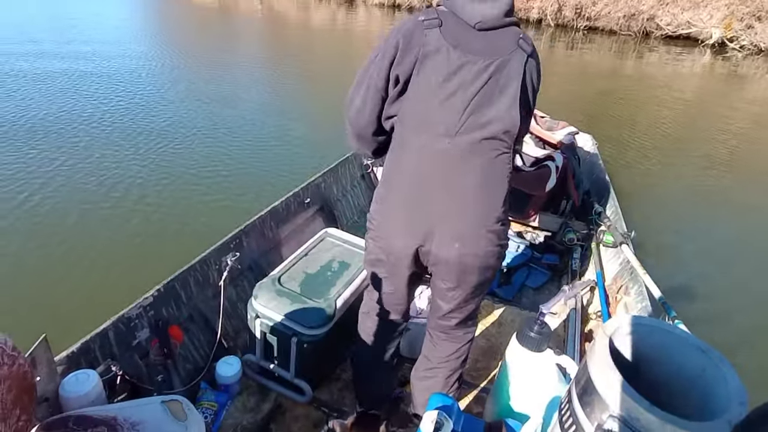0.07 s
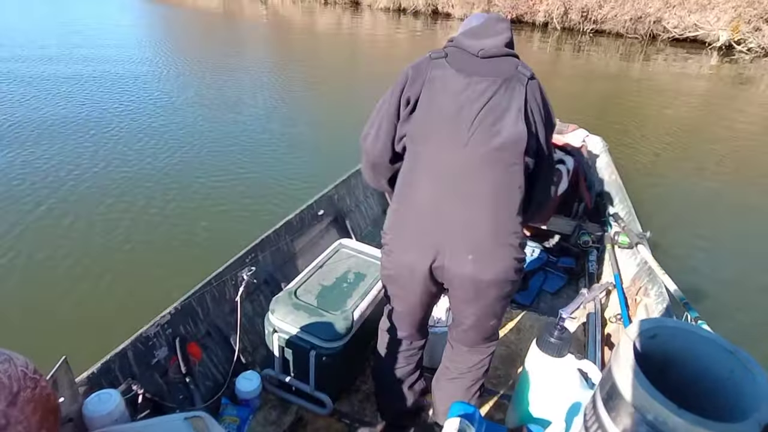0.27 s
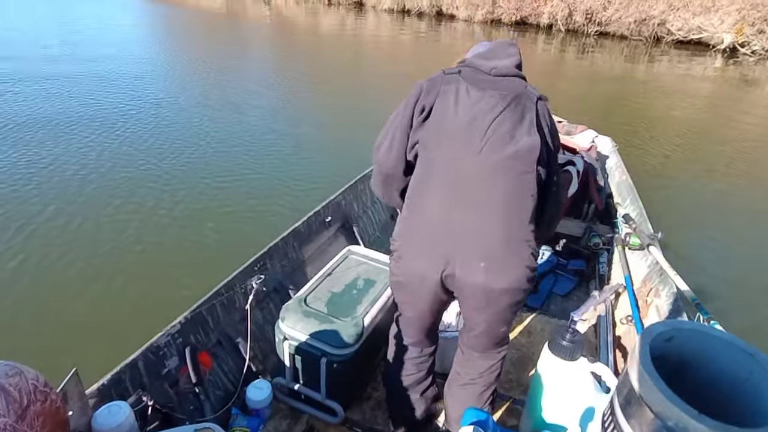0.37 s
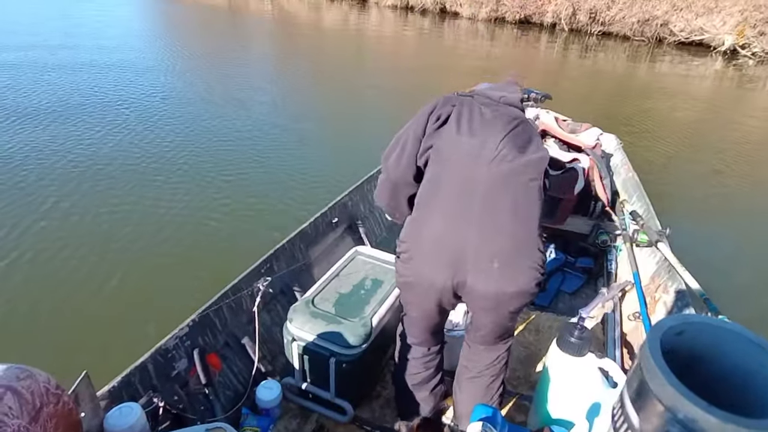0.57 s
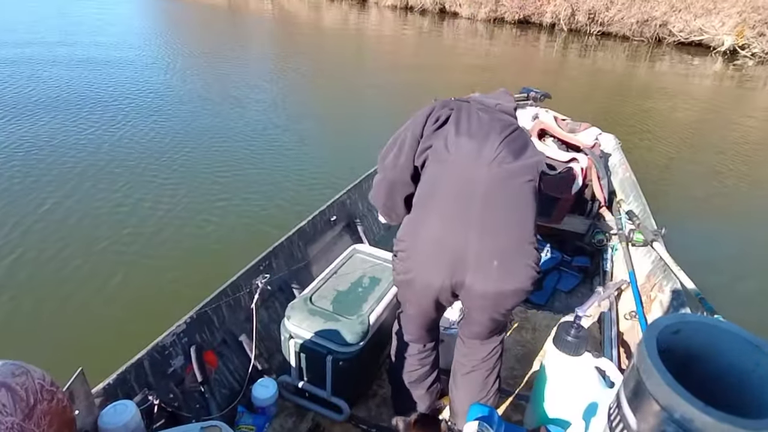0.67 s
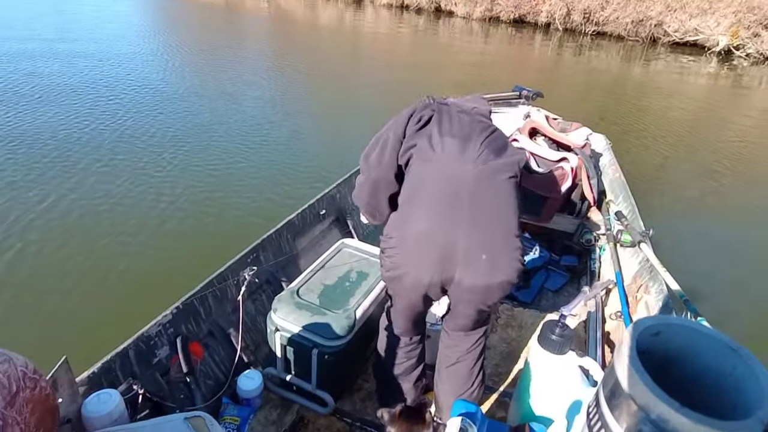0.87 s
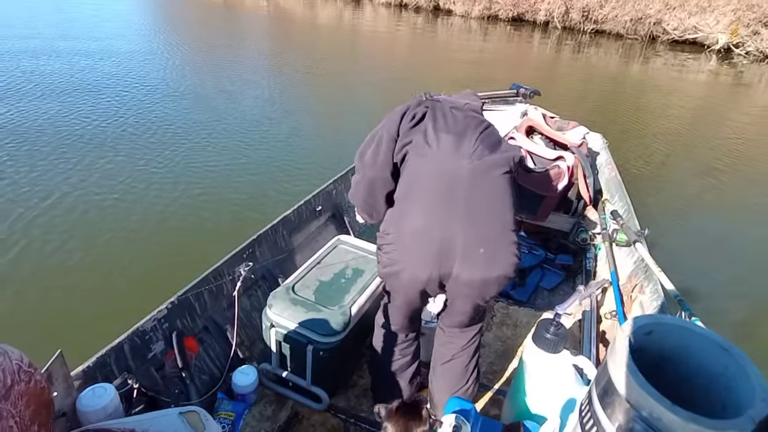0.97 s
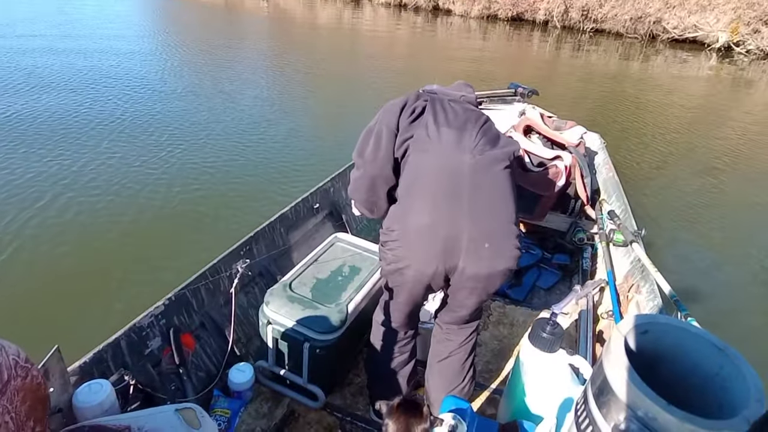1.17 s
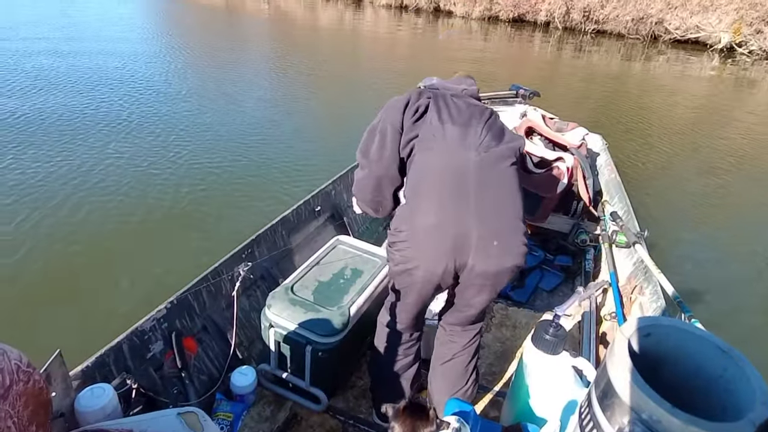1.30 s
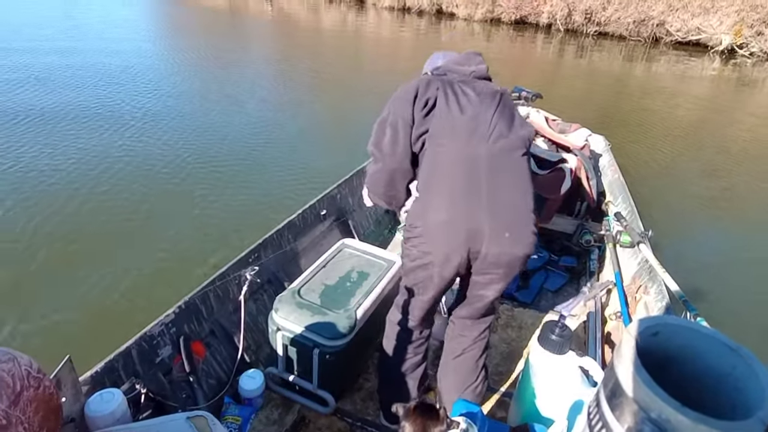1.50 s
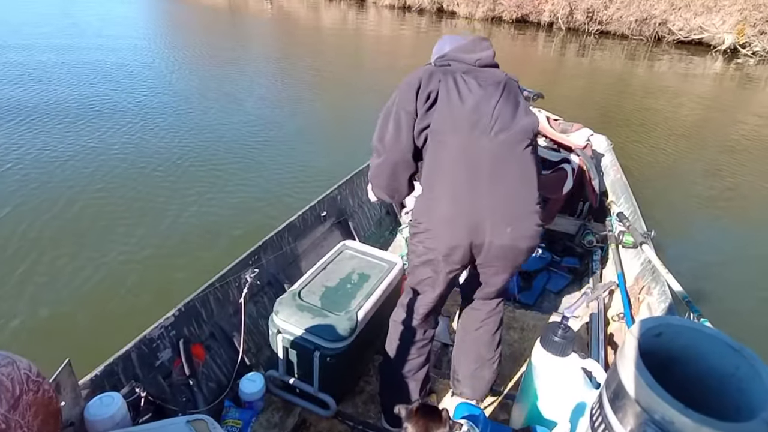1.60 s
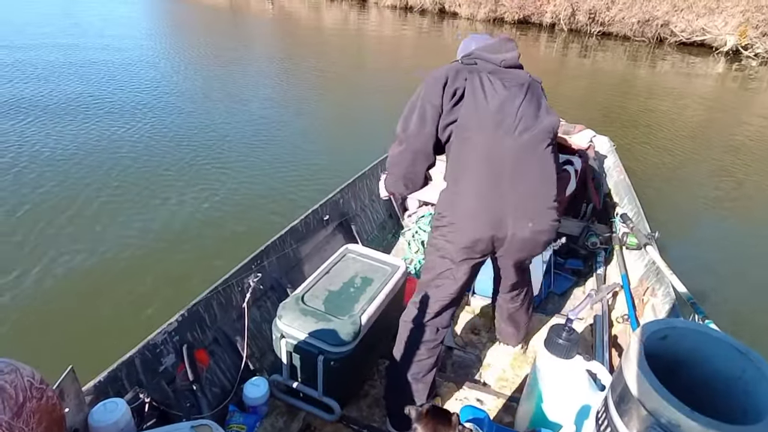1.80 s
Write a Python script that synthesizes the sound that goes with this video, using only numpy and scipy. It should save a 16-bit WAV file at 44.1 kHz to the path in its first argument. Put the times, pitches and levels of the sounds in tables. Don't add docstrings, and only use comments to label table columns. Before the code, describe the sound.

Knocks and thuds in a small metal boat, close and dry in stereo. A short gritty scuff comes at the start, then the loudest boot knock at 0.23 seconds booms the floor panel. Uneven low bumps, taps and rattles continue to about 1.15. A hollow box drags softly around 1.35, then scrapes and knocks near 1.7. Very faint air hiss and high insect ticking lie beneath.

```python
import sys
import numpy as np
from scipy import signal
from scipy.fft import rfft, irfft, next_fast_len
from scipy.io import wavfile
from scipy.ndimage import uniform_filter1d

SR = 44100
rng = np.random.default_rng(int(sys.argv[2]) if len(sys.argv) > 2 else 0)


def linear_from_db(decibels):
    return 10 ** (np.asarray(decibels, float) / 20)


def file_out(sig):
    cols = np.atleast_2d(sig).T
    lim = np.clip(cols, -1, 1)
    pcm = np.round(lim * 32767).astype(np.int16)
    wavfile.write(sys.argv[1], SR, pcm)


N = 81585
T = np.arange(N) / SR
BAND_EDGES_HZ = 30 * 2 ** np.arange(0, 9.3, 0.5)
LIKENESS = 0.14


def rms_one(x):
    return x / np.sqrt(np.mean(x ** 2) + 1e-20)


def at_hz(points, hz):
    p = np.array(points)
    return np.interp(np.log(hz + 1), np.log(p[:, 0] + 1), p[:, 1])


def high_pass(x, hz):
    return signal.sosfilt(signal.butter(4, hz, "high", fs=SR, output="sos"), x)


def ring(force, hz, t60_s):
    radius = linear_from_db(-60 / (t60_s * SR))
    w = 2 * np.pi * hz / SR
    return signal.lfilter([0, np.sin(w)], [1, -2 * radius * np.cos(w), radius ** 2], force + 1e-18)


def grains(rate_per_s):
    size = linear_from_db(3 * np.minimum(rng.exponential(1, N), 4))
    return size * rng.choice([-1, 1], N) * (rng.random(N) < rate_per_s / SR)


def bands(spectrum, likeness):
    edges = BAND_EDGES_HZ[BAND_EDGES_HZ > spectrum[0][0]]
    centre_hz = np.sqrt(edges[1:] * edges[:-1])
    level = linear_from_db(at_hz(spectrum, centre_hz))
    white = rng.standard_normal((2, 2, N))
    out = []
    for k, (low, high) in enumerate(zip(edges, edges[1:])):
        band = signal.butter(2, [low, high], "band", fs=SR, output="sos")
        mid, side = signal.sosfilt(band, white[k % 2])
        out.append(level[k] * (np.sqrt(1 + likeness) * mid + np.sqrt(1 - likeness) * side * [[1], [-1]]))
    return np.array(out) / np.sqrt(np.mean(np.sum(out, axis=0) ** 2)), np.log2(centre_hz / 4000)


# freq_hz, density_db_per_hz
AIR_COLOUR = [(18, -33), (30, -4.5), (145, 3), (311, -32), (760, -13), (1670, -20), (5900, -22),
              (16000, -41)]


def air():
    return linear_from_db(-80.5) * bands(AIR_COLOUR, likeness=0.17)[0].sum(axis=0)


def insect():
    tone_hz, pulses_per_s, first_s, pulse_s = 7990, 29.58, 0.009, 0.016
    phase = ((T - first_s) * pulses_per_s % 1) / pulses_per_s / pulse_s
    waver = rms_one(ring(rng.standard_normal(N), tone_hz, 0.028))
    tone = np.sin(2 * np.pi * tone_hz * T) + 0.5 * waver
    return linear_from_db(-86) * tone * np.sin(np.pi * np.minimum(phase, 1))


# start_s, length_s, hiss_db, tilt_db_per_octave, rib_rattle_db
SCUFFS = [(0.023, 0.036, -46.5, 1.2, -59), (0.567, 0.04, -95.5, -13, -64), (0.226, 0.074, -61, -4.5, -48),
          (0.313, 0.077, -84, -12, -58), (0.479, 0.074, -61, -3.5, -47), (0.642, 0.105, -72, -4.5, -60.5),
          (0.808, 0.048, -74, 0, -54), (0.842, 0.08, -69.5, -5.5, -51.5), (0.901, 0.14, -79.5, 0.5, -56),
          (1.047, 0.034, -54, 7, -58), (1.102, 0.1, -71.5, -5, -57.5), (1.313, 0.11, -63.5, -2, -62),
          (1.388, 0.11, -68.5, 5, -82.5), (1.594, 0.16, -69.5, 0.4, -78.5)]


def strokes():
    out = []
    for start_s, length_s, *_ in SCUFFS:
        age = (T - start_s) / length_s
        after_s = np.maximum(T - start_s - length_s, 0)
        rise = np.clip(age / 0.34, 0, 1) ** 2
        sag = linear_from_db(6 * (0.5 - np.clip(age, 0, 1)))
        release = linear_from_db(-60 * after_s / (0.045 + 0.35 * length_s))
        tail = linear_from_db(-16 - 60 * after_s / 0.25)
        out.append(rise * sag * (release + tail))
    return np.array(out)


# freq_hz, density_db_per_hz
SCUFF_COLOUR = [(530, -4), (900, 0.5), (1570, -4), (1990, -0.5), (2930, -10.5), (6480, -12.5),
                (14900, -35.5), (16000, -36)]


def scuffs():
    noise, octave = bands(SCUFF_COLOUR, LIKENESS)
    rows = np.array(SCUFFS)
    gain = linear_from_db(rows[:, 2] + rows[:, 3] * octave[:, None]) @ strokes()
    grit = rms_one(uniform_filter1d(rng.standard_normal(N), size=120))
    patch = rms_one(uniform_filter1d(rng.standard_normal(gain.shape), size=900, axis=1))
    gain = gain * linear_from_db(2.6 * patch)
    return np.sum(noise * gain[:, None], axis=0) * linear_from_db(3 * grit)


# freq_hz, level_db, t60_s
RIBS = [(386.4, 7, 0.034), (483, 2, 0.05), (532.6, 6, 0.024), (570, -10, 0.047), (747, 0, 0.077),
        (891, -6, 0.054), (1100, -16, 0.078), (1240, -11.5, 0.15)]


def ribs():
    slips = grains(900)
    dealt = rng.random((len(RIBS), N)) < 0.4
    rattle = sum(linear_from_db(db) * ring(slips * dealt[m], hz, t60_s) for m, (hz, db, t60_s) in enumerate(RIBS))
    slips = slips / np.sqrt(np.mean(rattle ** 2))
    slips = slips * (linear_from_db(np.array(SCUFFS)[:, 4] - 1) @ strokes())
    hits = np.array(TAPS[1:])
    hit_at = (hits[:, 0] * SR).astype(int)
    luck_db = 3.9 * rng.standard_normal((len(hits), len(RIBS)))
    out = 0
    for m, (hz, level_db, t60_s) in enumerate(RIBS):
        force = slips * dealt[m]
        force[hit_at] += linear_from_db(hits[:, 1] - 12) * linear_from_db(luck_db[:, m]) * (-1) ** m
        out = out + linear_from_db(level_db) * ring(force, hz, t60_s)
    return high_pass(out, 220)


# start_s, peak_db, t60_s, tilt_db_per_octave, strongest_hz
TAPS = [(0.2262, -18, 0.067, 3.5, 2030), (0.2788, -37.5, 0.037, 2, 2130), (0.4847, -35, 0.077, 3.5, 3740),
        (0.5063, -34.5, 0.011, 8, 4660), (0.5252, -47, 0.053, 10, 4500), (0.5444, -46, 0.042, 11.5, 2400),
        (0.6471, -48, 0.061, 6, 7200), (0.6825, -49, 0.022, 13.5, 7150), (0.795, -66, 0.084, 2.5, 3500),
        (0.8136, -43, 0.053, 2.3, 3200), (0.851, -36, 0.055, 1.5, 2270), (0.9011, -42, 0.029, -3, 1730),
        (0.953, -53.5, 0.058, -3, 1990), (1.016, -60.5, 0.046, -5, 850), (1.084, -54, 0.025, -5, 3100),
        (1.0571, -44.5, 0.25, 3.5, 1970), (1.1386, -50.5, 0.27, 9.5, 1930), (1.3766, -46, 0.33, 6, 5440),
        (1.6643, -48.5, 0.069, 5, 2600), (1.6971, -48.5, 0.048, 6.5, 2050), (1.726, -44.5, 0.03, 5.5, 4050)]
# freq_hz, density_db_per_hz
TAP_COLOUR = [(350, -38), (600, -4.5), (1070, -10.5), (1610, -10.5), (1960, -20), (5050, -22), (6370, -27),
              (16000, -52.5)]


def taps():
    noise, octave = bands(TAP_COLOUR, LIKENESS)
    decay_rate = 2 ** (0.55 * octave[:, None])
    gain = np.zeros((len(octave), N))
    for start_s, peak_db, t60_s, tilt_db, strongest_hz in TAPS:
        i = int((start_s - 0.0005) * SR)
        t = T[:min(N - i, SR // 4)]
        focus_db = 8 * np.exp(-((octave - np.log2(strongest_hz / 4000)) / 0.21) ** 2)
        colour_db = peak_db - 6 + tilt_db * octave + focus_db
        decay_db = -60 * t / max(t60_s, 0.005) * decay_rate
        gain[:, i:i + len(t)] += linear_from_db(colour_db[:, None] + decay_db) * np.minimum(t / 0.000067, 1)
    return np.sum(noise * gain[:, None], axis=0)


def hollow(force, modes, stagger):
    out = 0
    for k, (hz, width_hz, level_db) in enumerate(modes):
        late = np.roll(force, int(stagger * k))
        out = out + linear_from_db(level_db) * np.sqrt(width_hz / 40) * ring(late, hz, 5.9 / max(width_hz, 12))
    return high_pass(out, 0.83 * min(modes)[0])


def slide(rows, modes):
    time_s, level_db = np.transpose(rows)
    slips = grains(780)
    hits = np.zeros(N)
    for at_s, hit_db, *_ in TAPS[-2:]:
        hits[int(at_s * SR)] = linear_from_db(hit_db - 17) * (time_s[0] < at_s < time_s[-1])
    envelope = linear_from_db(np.interp(T, time_s, level_db, -150, -150) - 11)
    drag = hollow(slips * envelope, modes, 37.2) / np.std(hollow(slips, modes, 30))
    return drag + hollow(hits, modes, 35)


# time_s, level_db
FIRST_SLIDE = [
    (.026, -63),
    (.037, -44),
    (.065, -47),
    (.12, -75),
]
# time_s, level_db
BOX_SLIDES = [
    [(1.32, -69.5), (1.355, -45), (1.41, -53), (1.48, -55.5), (1.6, -75.5)],
    [(1.6, -62), (1.65, -50.5), (1.7, -53.5), (1.735, -51), (1.77, -73)],
]
# freq_hz, width_hz, level_db
SOLE_MODES = [(427, 60, -6), (545, 86, 13)]
BOX_A_MODES = [(519, 42, -4), (573, 32, 0), (732, 32, 0.5), (846, 25, 2), (1135, 120, -7.5)]
BOX_B_MODES = [(298, 37, -11), (490, 64, 7), (598, 56, 2.5), (702, 47, -13)]


def slides():
    later = slide(BOX_SLIDES[0], BOX_A_MODES) + slide(BOX_SLIDES[1], BOX_B_MODES)
    return slide(FIRST_SLIDE, SOLE_MODES) + later


def rocks(rows, t60_s, rough):
    out = np.zeros((2, N + SR))
    t = T[:SR // 4]
    wobble = rng.standard_normal((len(rows), 2, len(t)))
    wobble = rough * rms_one(uniform_filter1d(wobble, size=450, axis=2))
    for (start_s, peak_db, first_hz, last_hz, length_s), (swell, sway) in zip(rows, wobble):
        rise = np.sin(np.pi / 2 * np.minimum(t / (0.35 * length_s), 1)) ** 2
        droop_db = 3 * (0.5 - t / length_s)
        decay_db = -60 * np.maximum(t - length_s, 0) / t60_s
        pitch_hz = first_hz + (last_hz - first_hz) * np.minimum(t / length_s, 1.3)
        phase = 2 * np.pi * np.cumsum(pitch_hz) / SR + sway + 3 * rng.standard_normal()
        note = rise * linear_from_db(peak_db + droop_db + decay_db) * (1 + swell) * np.sin(phase)
        pan_db = 0.6 * rng.standard_normal() * np.array([[0.5], [-0.5]])
        out[:, int(start_s * SR):][:, :len(t)] += note * linear_from_db(pan_db)
    return out[:, :N]


# start_s, peak_db, first_hz, last_hz, length_s
BUMPS = [(0.298, -38, 127.6, 123.3, 0.024), (0.343, -48, 136, 105, 0.04), (0.398, -47.5, 108, 79.4, 0.036),
         (0.432, -61, 103, 109, 0.064), (0.485, -44.5, 127, 120, 0.048), (0.522, -40, 122, 100, 0.043),
         (0.592, -44.5, 116, 132, 0.027), (0.645, -44.5, 124, 130, 0.034), (0.682, -45, 118.7, 105, 0.068),
         (0.745, -46, 101, 123, 0.064), (0.812, -47, 106, 96, 0.015), (0.855, -39.5, 92.5, 131, 0.046),
         (0.918, -44.5, 116, 112, 0.027), (0.964, -45, 108, 117, 0.058), (1.028, -47.5, 124.6, 106, 0.057),
         (1.115, -50.5, 128.7, 92, 0.085), (1.225, -65, 90, 73, 0.034), (1.335, -63, 113, 187, 0.066),
         (1.688, -47.5, 150, 175, 0.016), (1.718, -50, 130, 127, 0.019), (1.748, -57, 120, 138, 0.032),
         (1.778, -53, 120, 91, 0.018), (1.806, -66.5, 71, 61, 0.053)]
UPPERS = [(.29, -51.5, 270, 239, 0.029), (.338, -46.5, 186, 211, 0.031), (.37, -49.5, 227, 194, 0.017),
          (.49, -48, 220, 211, 0.014), (.518, -42.5, 249.6, 226, 0.042), (.63, -48.5, 240.4, 189, 0.052),
          (.70, -49, 190, 175, 0.039), (.755, -49, 226, 243, 0.036), (.812, -53.5, 228, 228, 0.031),
          (.853, -40.5, 241.5, 237.7, 0.061), (.925, -48.5, 223.4, 181.4, 0.044),
          (.966, -41.5, 252, 238.4, 0.042), (1.035, -48.5, 248.6, 206.5, 0.059),
          (1.125, -54.5, 213.6, 185, 0.066), (1.728, -53.5, 268, 249, 0.012)]
HOLLOWS = [(.035, -46.5, 569, 545, 0.026), (.04, -59, 405, 410, 0.045), (1.332, -56.5, 461, 490, 0.065),
           (1.385, -55, 486, 520, 0.041), (1.348, -58, 713, 798, 0.057), (1.385, -62, 869, 866, 0.032),
           (1.385, -56.5, 326, 389, 0.045), (1.43, -58.5, 735, 755, 0.088), (1.445, -61.5, 865, 893, 0.033),
           (1.43, -60, 499, 464, 0.054), (1.505, -71, 545, 553, 0.058), (1.652, -58.5, 306, 362, 0.036),
           (1.65, -58.5, 617, 545, 0.037), (1.687, -55, 310, 307, .02), (1.692, -50, 470, 502, .018),
           (1.722, -54, 739, 690, 0.016), (1.732, -48, 502, 530, 0.0079)]


def hull():
    panel = rocks(BUMPS, t60_s=0.11, rough=0.2) + rocks(UPPERS, t60_s=0.11, rough=0.33)
    return high_pass(panel + rocks(HOLLOWS, t60_s=0.06, rough=0.33), 52)


def push(modes, start_s, level_db, length_ms):
    force = np.zeros(N)
    shape = np.hanning(int(length_ms * SR / 1000) + 3)
    force[int(start_s * SR):][:len(shape)] = shape / shape.sum() * linear_from_db(level_db)
    return sum(linear_from_db(db) * ring(force, hz, t60_s) * (-1) ** k for k, (hz, db, t60_s) in enumerate(modes))


# freq_hz, level_db, t60_s
HEEL_MODES = [(366.6, 6.5, 0.077), (540, 0, 0.17), (741, -0.5, 0.044), (878, -6, .05), (1053, -5, .06),
              (1223, -11.5, .06), (1380, -2, 0.097), (1745, -15.5, .05), (1927, -15, 0.071),
              (2190, -2, .054), (2690, -21.5, 0.024)]
PANEL_MODES = [(90, 3.5, 0.18), (124, 10, 0.077), (131.5, 3.5, 0.43), (175, 0, 0.23), (208.7, -3, 0.3),
               (253.4, -5, 0.21)]


def knock():
    knock_s, weight_s = 0.2252, 0.243
    heel = push(HEEL_MODES, knock_s, level_db=-29.5, length_ms=0.27)
    panel = push(PANEL_MODES, knock_s, level_db=-30.5, length_ms=0.71)
    weight = push(PANEL_MODES, weight_s, level_db=-31, length_ms=4.27)
    return high_pass(heel + panel + weight, 68)


# freq_hz, left_lead_rad
PORT_PHASE = [(0, -4.7), (600, -0.4), (1030, -0.5), (5430, -8.5), (8010, -2.5), (10600, -11), (16000, -3)]
# freq_hz, left_over_right_db
PORT_BALANCE = [(60, -4), (380, 1), (700, -0.5), (1290, 0.5), (2380, 2), (4400, -3.5), (8100, -2),
                (15000, 4.5)]


def ports(boat):
    size = next_fast_len(N + 4096)
    hz = np.arange(size // 2 + 1) * SR / size
    lead_rad = at_hz(PORT_PHASE, hz) * np.minimum(hz / 700, 1)
    turn = np.exp(0.5j * lead_rad * [[1], [-1]])
    balance = linear_from_db(at_hz(PORT_BALANCE, hz) * [[0.5], [-0.5]])
    return irfft(rfft(boat, size) * turn * balance, size)[:, :N]


def scene():
    boat = scuffs() + ribs() + taps() + slides() + hull() + knock()
    return air() + insect() + ports(boat)


def band_limit(x):
    return signal.sosfilt(signal.butter(12, 15900, fs=SR, output="sos"), x)


def record(dry):
    mix = high_pass(dry, 38)
    return band_limit(mix)


dry = scene()
out = record(dry)
file_out(out)
```